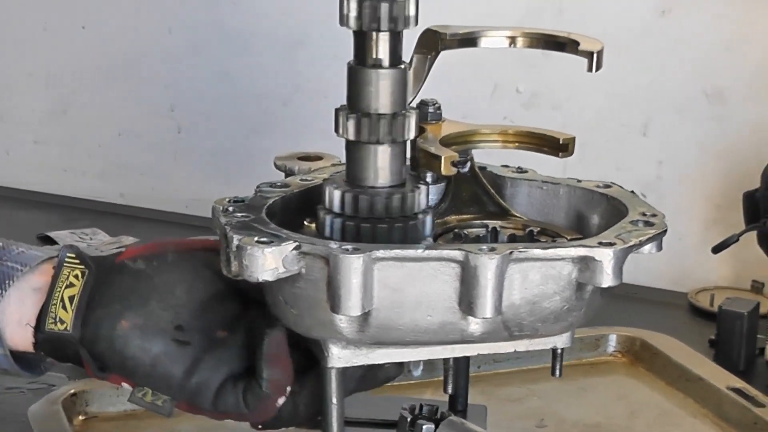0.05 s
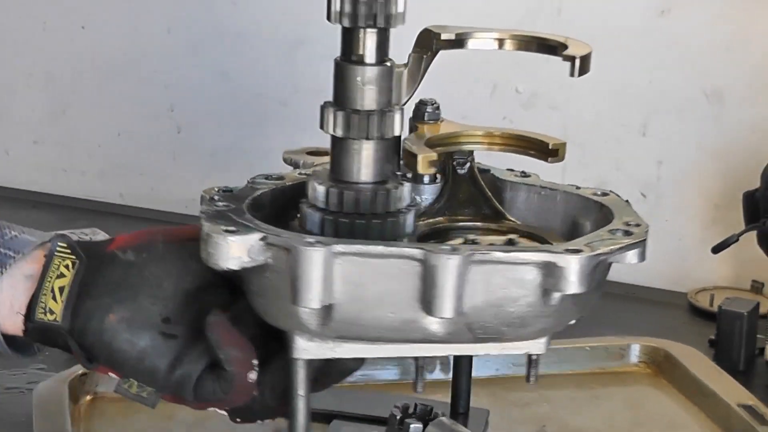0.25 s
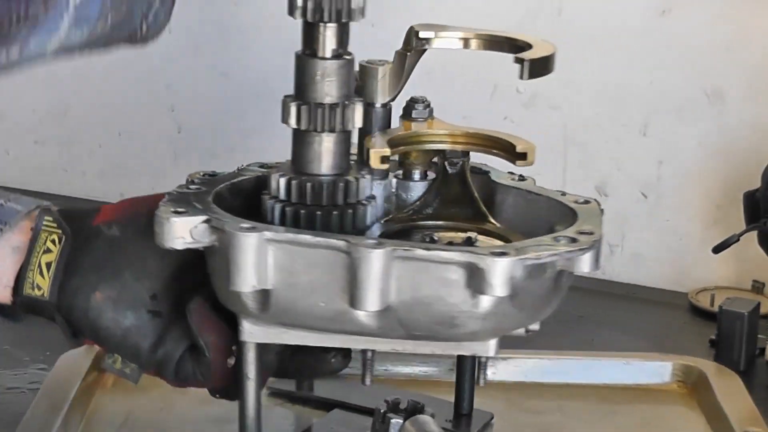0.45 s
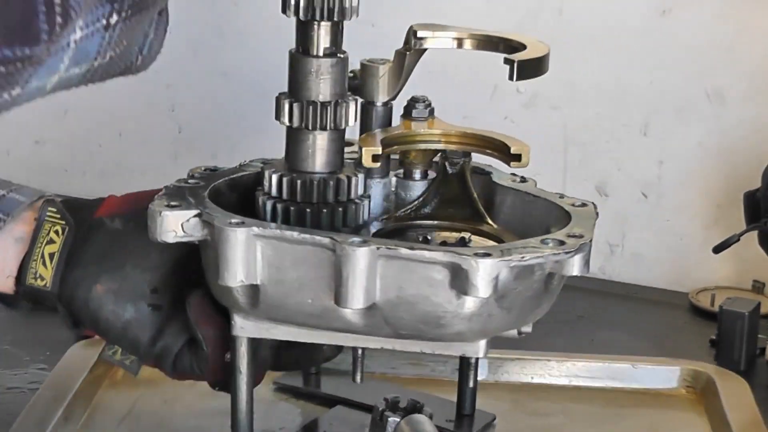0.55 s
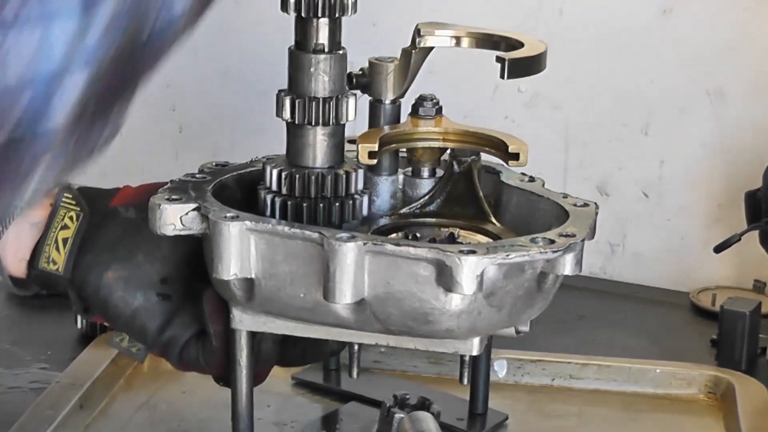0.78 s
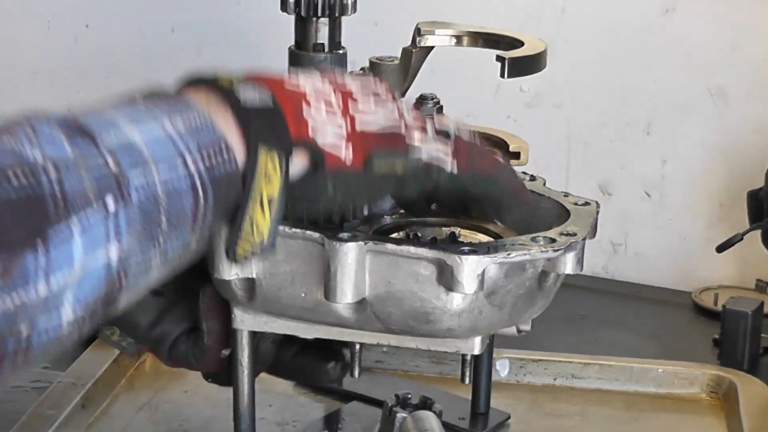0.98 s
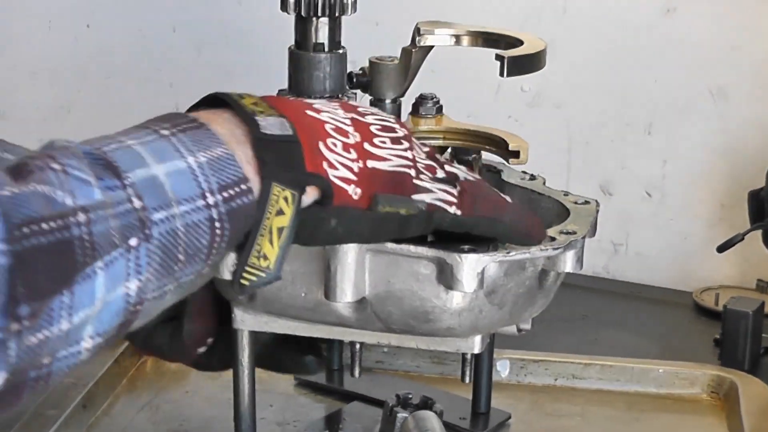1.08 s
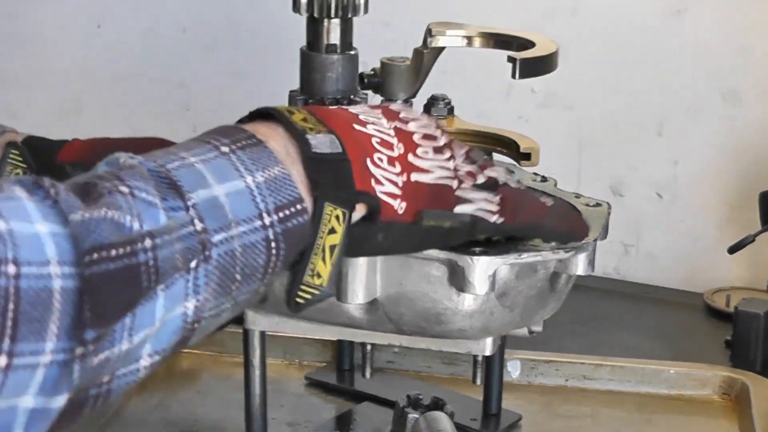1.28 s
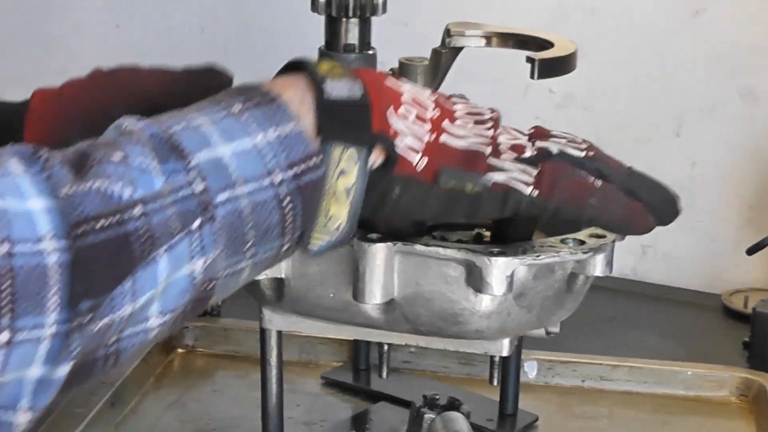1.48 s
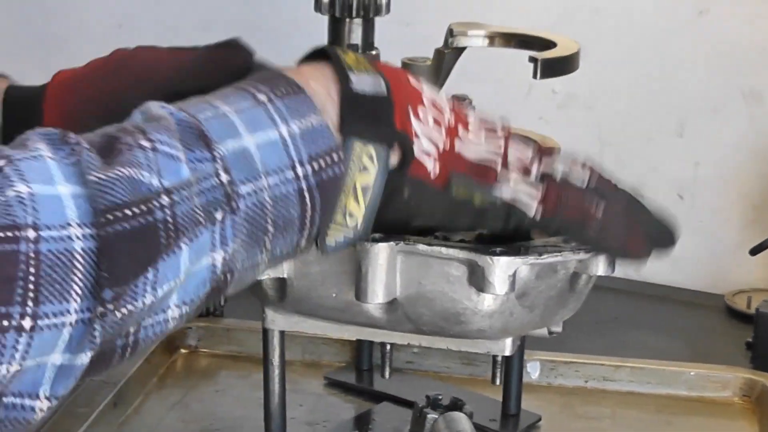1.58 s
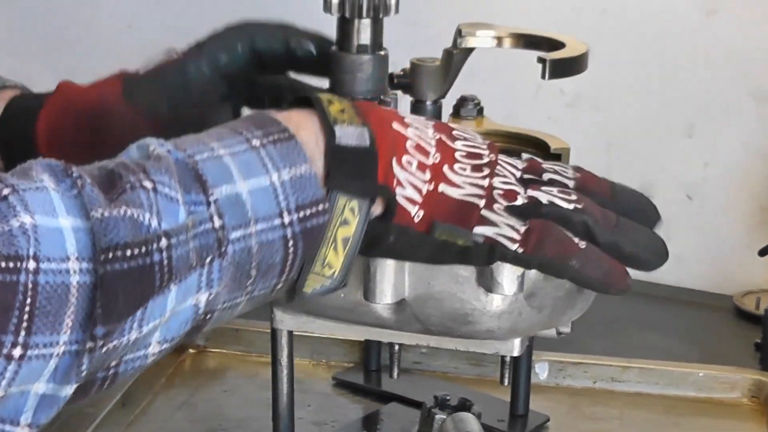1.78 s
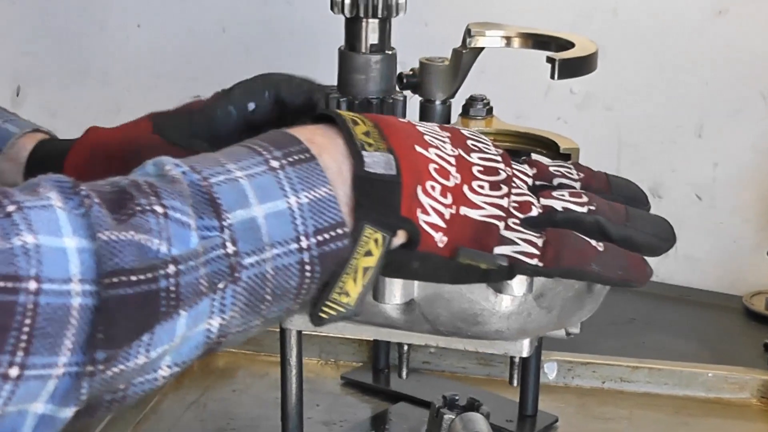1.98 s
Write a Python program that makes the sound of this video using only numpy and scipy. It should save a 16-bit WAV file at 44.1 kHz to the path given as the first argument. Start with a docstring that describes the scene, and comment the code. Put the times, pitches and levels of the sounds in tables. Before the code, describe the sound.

Metal clinks and knocks as a gear slides onto a shaft and is settled.

```python
"""Fitting a gear into a gearbox

Close by in a small workshop, a steel gear slides down a splined shaft into an open aluminium casing.
Stick-slip friction makes it scrape; it catches with a clink of its own high modes and lands with a
clack, an impact that sets the casing ringing. Smaller knocks and clinks follow as the parts are
settled. A short reverberation surrounds them, and a low room noise lies underneath."""
import sys
import numpy as np
from scipy import signal
from scipy.fft import rfft, irfft
from scipy.io import wavfile

SR = 44100
rng = np.random.default_rng(int(sys.argv[2]) if len(sys.argv) > 2 else 0)


def waveform_to_disk(signal):
    """Save audio, clipped to [-1, 1], as 16-bit WAV at the path in sys.argv[1]."""
    frames = np.transpose(np.atleast_2d(signal))
    scaled = np.clip(frames, -1, 1) * 32767
    samples = np.round(scaled).astype(np.int16)
    wavfile.write(sys.argv[1], SR, samples)


N = 90404
TIME = np.arange(N) / SR
RING_TIME = TIME[:SR // 2]
BINS_HZ = np.maximum(np.arange(N // 2 + 1) * SR / N, 1)
MODE_RISE_S = 0.0013

# Normal modes of the casing: pitch_hz, level_db, t60_s
CASING_MODES = [(510, -19.5, 0.15), (1018.6, -13, 0.13), (1112, -19.5, 0.101), (1178, -21.5, 0.1),
                (1415, -18.5, .1), (1765, -12.5, 0.069), (2030, -11.5, 0.088), (2168, -21, 0.11),
                (3820, -15, 0.0618), (4640, -21, 0.135)]


def from_db(db):
    """Decibels to amplitude ratio."""
    return 10 ** (np.asarray(db) / 20)


def rms_one(x):
    """Normalisation to unit power."""
    return x / np.sqrt(np.mean(x ** 2) + 1e-20)


def at_hz(table, hz, column=1):
    """Interpolation of a table column along log frequency."""
    table = np.array(table)
    return np.interp(np.log(hz), np.log(table[:, 0]), table[:, column])


def coloured(x, gain_db):
    """Spectral shaping: each frequency bin has its own gain."""
    return irfft(rfft(x) * from_db(gain_db), len(x))


def struck(t, rise_s, t60_s):
    """Envelope of a damped vibration: linear rise, then exponential decay."""
    return np.clip(t / rise_s, 0, 1) * np.exp(-np.log(1000) * np.maximum(t - rise_s, 0) / t60_s)


def ring(hz, rise_s, t60_s, flutter_hz=75, onset_s=.02):
    """A damped mode that starts clean and soon flutters by random amplitude and phase modulation."""
    t = RING_TIME
    rates_hz = np.arange(len(t) // 2 + 1) * SR / len(t)
    spectra = rfft(rng.standard_normal((2, len(t))))
    in_phase, quadrature = rms_one(irfft(spectra / (1 + (rates_hz / flutter_hz) ** 4), len(t)))
    share = .7 * (1 - np.exp(-(t / onset_s) ** 2))
    flutter = np.sqrt(1 - share) + np.sqrt(share / 2) * (in_phase + 1j * quadrature)
    return struck(t, rise_s, t60_s) * np.imag(flutter * np.exp(2j * np.pi * (hz * t + rng.random())))


def add(out, start_s, sound):
    """Superposition of a sound at its start time."""
    i = int(start_s * SR)
    out[i:i + len(sound)] += sound[:N - i]


def room_noise(level_db=-52.5):
    """Steady low noise, partly coherent between left and right."""
    # Noise spectrum: frequency_hz, density_db
    spectrum = [(90, -1), (494, -5.5), (1000, -11.5), (1760, -15), (3010, -22), (7950, -27), (15500, -43.5)]
    # Likeness of left and right: frequency_hz, correlation
    likeness = [(80, 0.62), (12000, 0.9)]
    correlation, colour_db = at_hz(likeness, BINS_HZ), at_hz(spectrum, BINS_HZ)
    mid = coloured(rng.standard_normal(N), colour_db + 10 * np.log10(1 + correlation))
    side = coloured(rng.standard_normal(N), colour_db + 10 * np.log10(1 - correlation))
    return from_db(level_db) * rms_one(mid + side * np.array([[1], [-1]]))


def slide(slips_per_s=7000, judder_hz=42.9, judder_db=1.7, casing_db=-27):
    """Stick-slip friction: dense, juddering slips on the splines hiss and excite the casing."""
    # Course of the slide (tilt lifts the treble and cuts the bass): time_s, level_db, tilt_db
    course = [(0, -61.5, -4), (.17, -62.5, 3), (0.204, -39, -4), (0.21, -35.5, 8.5), (.25, -40, -0.5),
              (.3, -39, 3), (.35, -33.5, -2.5), (.43, -38.5, 0.5), (.5, -38, -0.5), (.55, -36.5, 0),
              (.62, -46.5, -4.5), (0.643, -42.5, 1.5), (.675, -48.5, 0.5), (.75, -50.5, 0.5),
              (0.831, -49.5, -2), (.885, -81, -13), (0.934, -74, -1), (.955, -54.5, -2.5), (1.06, -93, 1.5)]
    # Friction spectrum: frequency_hz, density_db
    spectrum = [(700, -13.5), (1370, -5), (1850, -3.5), (2300, -5.5), (3730, -9), (4520, -2), (6590, -11),
                (9350, -12.5), (15500, -33.5)]
    times, levels, tilts = np.transpose(course)
    level_db, tilt_db = np.interp(TIME, times, levels), np.interp(TIME, times, tilts)
    sizes = from_db(2.5 * np.minimum(rng.exponential(1, N), 5)) * rng.choice([-1, 1], N)
    slips = sizes * (rng.random(N) < slips_per_s / SR)
    judder = rms_one(coloured(rng.standard_normal(N), -20 * np.log10(1 + (BINS_HZ / judder_hz) ** 2)))
    bass_cut_db = -10 * np.log10(1 + (180 / BINS_HZ) ** 4)
    hiss = rms_one(coloured(slips, at_hz(spectrum, BINS_HZ) + bass_cut_db))
    low = coloured(hiss, -20 * np.log10(1 + (BINS_HZ / 3200) ** 2))
    tilted = low * from_db(-tilt_db) + (hiss - low) * from_db(tilt_db)
    scrape = tilted * from_db(level_db + judder_db * judder)
    casing = sum(from_db(db) * ring(hz, MODE_RISE_S, t60_s) for hz, db, t60_s in CASING_MODES)
    return scrape + from_db(casing_db) * signal.fftconvolve(scrape, casing / np.linalg.norm(casing))[:N]


def knocks(crack_db=3.5, spread_db=1.5, load_detune=.007):
    """Impact excitation: a crack of crowded, quickly damped modes, then the casing's longer ring."""
    # Contacts of steel parts: start_s, level_db at each of bands_hz, rise_s
    contacts = [(0.077, -30.5, -34.5, -33.5, -34, -55, -54, 0.00048),
                (0.137, -37, -33, -37, -61, -67, -62, 0.0011),
                (0.15, -28.5, -36.5, -37.5, -45, -43.5, -50.5, 0.002),
                (0.2639, -26, -28.5, -18.5, -20, -18, -15.5, 0.00045),
                (0.3597, -42, -16.5, -10.5, -17, -19.5, -46, 0.0023),
                (0.381, -40, -19, -22.5, -33, -26, -46, 0.0046),
                (0.388, -57, -17.5, -28.5, -25, -28, -31, 0.0056),
                (0.503, -45, -48, -56, -30.5, -21.5, -54, .004),
                (0.712, -28, -31, -33.5, -41.5, -45, -46.5, 0.011),
                (0.7599, -67, -27.5, -25, -36.5, -52, -55, 0.0017),
                (0.793, -29, -36.5, -31, -33.5, -46, -38.5, 0.0021),
                (1.2182, -35.5, -31, -30.5, -26.5, -36, -46, 0.00021),
                (1.2368, -37.5, -29, -35, -24.5, -30.5, -38.5, 0.0019),
                (1.303, -36, -39, -35.5, -36, -34, -52, 0.0014),
                (1.3116, -50, -34, -40, -36, -51, -55, 0.0012),
                (1.352, -48, -29.5, -35.5, -34.5, -39.5, -44.5, 0.002),
                (1.5597, -36, -31, -26.5, -34, -32, -39, 0.0031),
                (1.812, -50, -30.5, -32, -33, -32.5, -41, 0.0037),
                (2.011, -36, -28, -26.5, -33, -40.5, -51, 0.0014)]
    # Points of the contact spectrum: frequency_hz
    bands_hz = [500, 1100, 1900, 3400, 5400, 9000]
    # Gaps between the assembly's modes: centre_hz, depth_db, width_hz
    hollows = [(2550, -4.5, 213), (6500, -6, 620)]
    out, t = np.zeros(N), RING_TIME
    hz = np.maximum(np.arange(len(t) // 2 + 1) * SR / len(t), 1)
    octaves_below = np.maximum(np.log2(bands_hz[0] / hz), 0)
    octaves_above = np.maximum(np.log2(hz / bands_hz[-1]), 0)
    skirts_db = -13.5 * octaves_below - 47 * octaves_above
    hollows_db = sum(depth * np.exp(-((hz - centre) / width) ** 2) for centre, depth, width in hollows)
    for start_s, *levels_db, rise_s in contacts:
        spectrum = list(zip(bands_hz, levels_db))
        noise = rng.choice([-1., 1.], len(t))
        crack = coloured(noise, at_hz(spectrum, hz) + skirts_db + hollows_db + crack_db)
        add(out, start_s, crack * struck(t, rise_s, t60_s=0.044))
        for pitch_hz, level_db, t60_s in CASING_MODES:
            # Each contact couples to a mode differently, and its load shifts the pitch a little.
            coupling, load = rng.standard_normal(2)
            gain = from_db(level_db + at_hz(spectrum, pitch_hz) + spread_db * coupling)
            add(out, start_s, gain * ring(pitch_hz * (1 + load_detune * load), rise_s, t60_s))
    return out


def pings():
    """Resonance: single modes of the part touched stand out in some contacts."""
    # Prominent modes: start_s, pitch_hz, level_db, t60_s
    resonances = [(.148, 362, -38.5, 0.043), (0.2637, 8860, -16.5, 0.0042), (.7605, 1990, -29.5, 0.038),
                  (1.2186, 3140, -22.5, 0.011), (1.238, 2870, -35.5, 0.14), (1.353, 1736, -34.5, 0.029),
                  (1.5604, 508, -38.5, 0.073), (1.5604, 636, -36, 0.047), (1.5604, 3025, -47, 0.084),
                  (1.5604, 3490, -32, 0.011), (2.012, 1021, -34, 0.12)]
    out = np.zeros(N)
    for start_s, pitch_hz, level_db, t60_s in resonances:
        add(out, start_s, from_db(level_db) * ring(pitch_hz, MODE_RISE_S, t60_s))
    return out


def clinks():
    """Free vibration of the gear's high modes; glove and shaft damp and detune the main tone."""
    # Strikes on the gear: start_s, pitch_hz, main_db, lower_db, upper_db, rise_s, main_t60_s
    strikes = [(0.2656, 7615, -9.5, -55, -27.5, 0.0021, 0.046), (0.346, 7600, -32, -52, -66, 0.028, 0.052),
               (.794, 7780, -42, -65, -66, 0.0015, 0.1), (1.219, 7820, -35.5, -64, -52, 0.0014, 0.086),
               (1.239, 7530, -29, -56, -45, 0.00054, 0.045), (1.248, 7565, -30, -50, -52, 0.0087, 0.088),
               (1.308, 7690, -40, -33, -59, 0.0021, 0.21), (1.560, 7670, -38, -42.5, -52, 0.0012, 0.16),
               (1.8133, 7570, -40, -36, -93, 0.0069, 0.083)]
    # Faint after-ring, a split pair around the main tone: offset_hz, relative_db, t60_s
    split_pair = [(25.5, -51.5, 0.25), (-20.5, -30, .45)]
    # Modes below the main tone: pitch_hz, relative_db, t60_s
    lower_modes = [(5990, -7, 0.13), (5950, -7, 0.046), (5985, -21, 0.33)]
    # Overtones: pitch_hz, relative_db, t60_s
    upper_modes = [(12285, -12.5, 0.11), (13600, -8.5, .06), (14225, -3, .05)]
    out = np.zeros(N)
    for start_s, pitch_hz, main_db, lower_db, upper_db, rise_s, main_t60_s in strikes:
        add(out, start_s, from_db(main_db) * ring(pitch_hz, rise_s, main_t60_s))
        after_ring = [(pitch_hz + offset_hz, db, t60_s) for offset_hz, db, t60_s in split_pair]
        for level_db, modes in (main_db, after_ring), (lower_db, lower_modes), (upper_db, upper_modes):
            for hz, relative_db, t60_s in modes:
                add(out, start_s, from_db(level_db + relative_db) * ring(hz, rise_s, t60_s))
    return out


def workshop(x, gap_s=0.00394):
    """Reverberation: convolution with a short diffuse tail, each band decaying at its own rate."""
    # Diffuse field: frequency_hz, level_db, t60_s, stereo_width
    room = [(249.6, 5.5, 0.19, 0.39), (1700, -9, 0.45, 0.62), (3980, -7.5, 0.34, .2),
            (8000, -13, 0.38, 0.17), (13960, -10, .17, 0.45)]
    t, response = RING_TIME, 0
    edges_hz = np.geomspace(90, 18000, 12)
    for low, high in zip(edges_hz, edges_hz[1:]):
        level_db, t60_s, width = (at_hz(room, np.sqrt(low * high), column) for column in (1, 2, 3))
        envelope = struck(t, gap_s, t60_s) * (t > gap_s)
        tail = rng.standard_normal((2, len(t))) * envelope / np.linalg.norm(envelope)
        mid, side = signal.sosfilt(signal.butter(3, [low, high], "band", fs=SR, output="sos"), tail)
        response = response + from_db(level_db) * (mid + width * side * np.array([[1], [-1]]))
    return signal.fftconvolve(x[None], response, axes=1)[:, :N]


def scene(pan_db=-.15):
    """Superposition of direct sound from almost straight ahead, reverberation and room noise."""
    metal = knocks() + pings() + clinks() + slide()
    return metal * from_db([[pan_db], [-pan_db]]) + workshop(metal) + room_noise()


def record(dry, low_cut_hz=83, high_cut_hz=15900):
    """Band limiting: the deep bass is rolled off and the top is cut steeply."""
    dry = signal.sosfilt(signal.butter(3, low_cut_hz, "high", fs=SR, output="sos"), dry)
    return signal.sosfilt(signal.ellip(12, .1, 80, high_cut_hz, fs=SR, output="sos"), dry)


dry = scene()
out = record(dry)
waveform_to_disk(out)
```